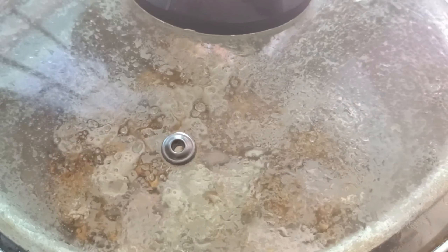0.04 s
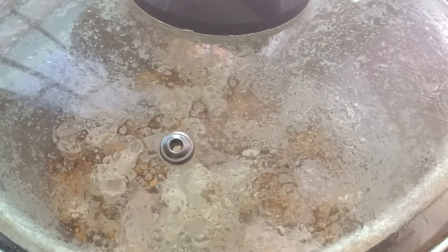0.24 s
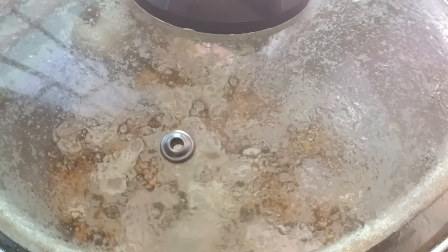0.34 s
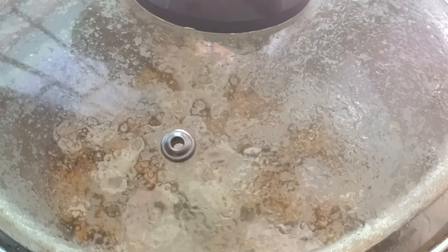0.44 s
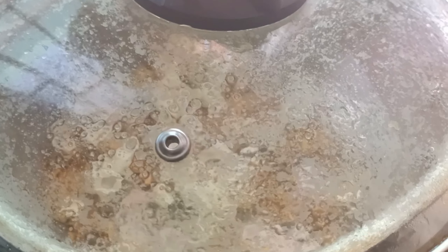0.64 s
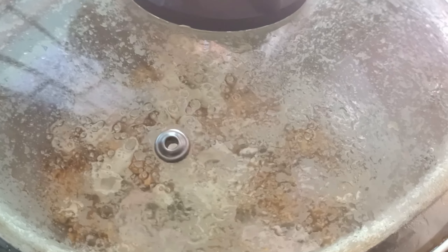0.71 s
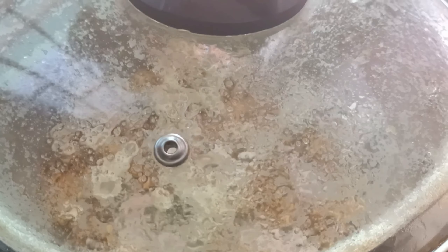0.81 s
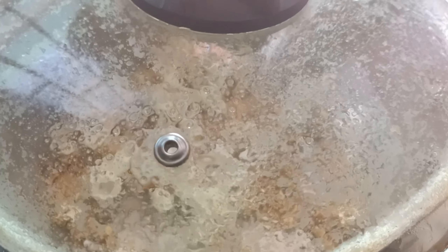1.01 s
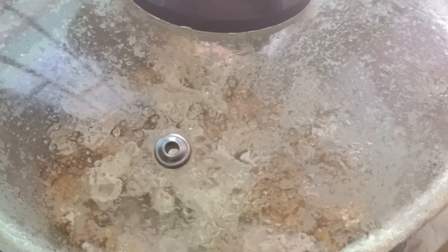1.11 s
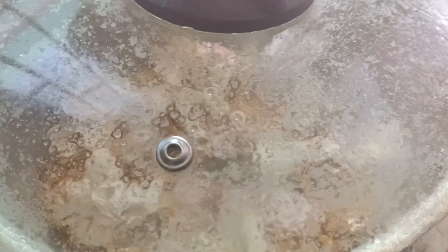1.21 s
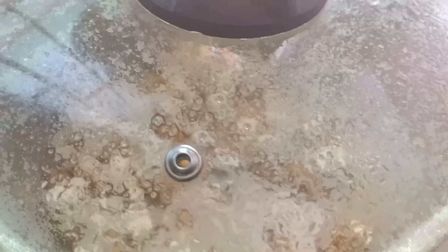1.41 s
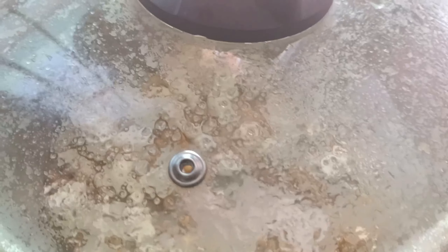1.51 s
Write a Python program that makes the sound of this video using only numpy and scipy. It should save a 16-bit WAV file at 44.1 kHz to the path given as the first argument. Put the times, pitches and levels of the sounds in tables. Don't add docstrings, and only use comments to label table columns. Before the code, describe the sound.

Close popcorn popping under a glass lid, with hollow thumps, steamy puffs and a faint oil sizzle

```python
import sys
import numpy as np
from scipy import signal
from scipy.fft import rfft, irfft
from scipy.io import wavfile
from scipy.ndimage import uniform_filter1d, map_coordinates

SR = 44100
rng = np.random.default_rng(int(sys.argv[2]) if len(sys.argv) > 2 else 0)


def boost_factor(decibels):
    exponent = np.asarray(decibels, float) / 20
    return 10 ** exponent


def pcm_store(signal):
    levels = np.round(np.clip(np.atleast_2d(signal), -1, 1) * 32767)
    wavfile.write(sys.argv[1], SR, levels.astype(np.int16).T)


N = 68355


def unit(x):
    return x / np.sqrt(np.mean(x ** 2) + 1e-20)


def along(points, hz):
    point_hz, value = np.transpose(points)
    return np.interp(np.log(hz + 1), np.log(point_hz + 1), value)


def add(track, start_s, sound):
    i = round(start_s * SR)
    part = sound[:, max(-i, 0):N - i]
    track[:, max(i, 0):max(i, 0) + part.shape[1]] += part


def wobble(rate_hz):
    knots = rng.standard_normal(int(N * rate_hz / SR) + 4)
    return map_coordinates(knots, [np.arange(N) * rate_hz / SR])


# pitch_hz, correlation (0 to 1)
ALIKE = [(100, 0.98), (250, 0.96), (600, .5), (1650, 0.06), (5000, 0)]


def rush(pair, colour_db):
    size = pair.shape[1]
    hz = np.fft.rfftfreq(size, 1 / SR)
    turn = np.arccos(np.clip(along(ALIKE, hz), -1, 1)) / 2
    spectra = rfft(pair) * boost_factor(colour_db(hz)) * [np.cos(turn), np.sin(turn)]
    mid, side = irfft(spectra, size)
    return unit(np.array([mid + side, mid - side]))


MODE_SCATTER_DB = 1
FLUTTER_S, FLUTTER_RAD = .006, .4


def ring(hz, modes, weight_db, rise_s):
    columns = np.vstack([hz, np.transpose(modes)])
    hz, db, t60_s, pan_db, lead_rad = (c[:, None] for c in columns)
    t = np.arange(SR // 4) / SR
    side = np.array([.5, -.5])[:, None, None]
    level_db = db + weight_db(hz) + MODE_SCATTER_DB * rng.standard_normal(hz.shape) - 60 * t / t60_s
    knots = rng.standard_normal((len(hz), int(t[-1] / FLUTTER_S) + 2))
    drift = np.array([np.interp(t / FLUTTER_S, np.arange(len(k)), k - k[0]) for k in knots])
    flutter = FLUTTER_RAD * drift * np.minimum(hz / 2500, 1)
    waves = np.sin(2 * np.pi * hz * t + flutter + side * lead_rad)
    return (boost_factor(level_db) * boost_factor(side * pan_db) * waves).sum(1) * (1 - np.exp(-t / rise_s)) ** 2


CONTACT_S, KNOCK_T60_S = 0.00038, 0.05


def struck(blows, modes_hz, modes):
    out = np.zeros((2, N))
    t = np.arange(SR // 10) / SR
    for start_s, level_db, centre_hz, spread_oct, *knock_db in blows:
        near_db = lambda hz: -6 * (np.log2((hz + 1) / centre_hz) / spread_oct) ** 2
        add(out, start_s, boost_factor(level_db) * ring(modes_hz, modes, near_db, CONTACT_S))
        if knock_db:
            knock = rush(rng.standard_normal((2, len(t))), near_db) * (1 - np.exp(-t / CONTACT_S))
            add(out, start_s, boost_factor(knock_db[0] - 60 * t / KNOCK_T60_S) * knock)
    return out


# pitch_hz, level_db
STEAM = [(300, -29.5), (520, -15.5), (950, -12), (1600, -13.5), (2000, -5.5), (4800, -7.5), (11200, -4.5),
         (15500, -15.5)]
WALL_PASS_DB, WALL_WIDTH = 6, 0.019


def through_walls(hz):
    near = sum(1 / (1 + ((hz - c) / (WALL_WIDTH * c)) ** 2) for c in [*POT_HZ, *LID_HZ])
    return along(STEAM, hz) + WALL_PASS_DB * np.minimum(near, 1)


# start_s, level_db, t60_s, brightness_db_per_octave
PUFFS = [(-.02, -32.5, 0.32, 1.5), (0.2421, -24, 0.4, -1.5), (.2853, -30, 0.55, -5),
         (0.3015, -32, 0.13, -5), (0.394, -36, .1, -5.5), (0.4194, -29, 0.45, -0.5),
         (0.474, -18.5, 0.31, 2.5), (.496, -22, 0.28, 0), (0.5927, -27.5, 0.29, -0.5),
         (.686, -36.5, 0.39, -5.5), (.869, -44, 0.57, 1), (0.8914, -25.5, 0.26, 4),
         (0.923, -36.5, 0.18, -3), (1.2301, -26.5, 0.19, -1), (1.537, -42.5, 0.26, -1.5)]
PUFF_RISE_S, CRACK_DB, CRACK_T60_S = 0.0014, 0.5, 0.042
TREBLE_FASTER = 0.26


def puffs():
    out = np.zeros((2, N))
    t = np.arange(SR // 3) / SR
    for start_s, level_db, t60_s, tilt_db in PUFFS:
        colour_db = lambda hz: through_walls(hz) + tilt_db * np.log2((hz + 1) / 4000)
        hiss = rush(rng.standard_normal((2, len(t))), colour_db)
        dull = uniform_filter1d(hiss, size=5)
        treble = (hiss - dull) * boost_factor(-60 * t / (t60_s * (1 - TREBLE_FASTER)))
        body = dull * boost_factor(-60 * t / t60_s) + treble
        crack = hiss * boost_factor(CRACK_DB - 60 * t / CRACK_T60_S)
        add(out, start_s, boost_factor(level_db) * (body + crack) * (1 - np.exp(-t / PUFF_RISE_S)))
    return out


# start_s, level_db, favoured_hz, spread_octaves
POT_BLOWS = [
    (-.02, -44.5, 1420, 1.3),
    (.2428, -27, 2060, 0.87),
    (.4198, -35.5, 2840, 0.93),
    (.4745, -24, 2550, 1.08),
    (.495, -31, 1780, 0.9),
    (.69, -48.5, 1860, 0.55),
    (.892, -39, 1730, 0.85),
    (1.2305, -35, 2000, 0.46),
    (1.232, -26, 3670, 0.13),
    (1.484, -47, 1600, 0.88),
]
POT_HZ = [810, 1050, 1313, 1937, 2085, 2386, 2967, 3591, 5055, 5378, 5430, 6300]
# level_db, t60_s, left_right_db, left_lead_rad
POT = [(-18, 0.045, 0, 2), (-8, 0.2, 9, 2), (1.5, 0.19, 2.5, -1.05), (4, 0.11, 9, 1.45),
       (3.5, 0.13, 1.5, 4), (5.5, 0.066, 15.5, -2), (-7, 0.24, 11, 0.5), (6, 0.19, -4, 3.61),
       (-21, 0.12, -8, -6), (2, 0.08, 1, -6), (4, 0.084, 24, -1), (-7, 0.084, -13, -23)]


def pot_blows():
    return struck(POT_BLOWS, POT_HZ, POT)


# start_s, level_db, high_mode_lean_db_per_octave
THUMPS = [(-.01, -41.5, 2.5), (.025, -45.5, 3), (.243, -30, -7.5), (0.296, -39, -9.5), (.42, -36.5, -2),
          (.476, -32, 5), (0.4937, -26.5, 2.5), (0.561, -46.5, 10), (.69, -58, 11), (0.893, -33.5, -0.5),
          (1.2292, -26, 3), (1.285, -42.5, 0), (1.325, -44.5, -3), (1.483, -56, 3.5), (1.528, -53.5, -0.5)]
AIR_HZ = [122, 165, 240, 282, 320, 460, 560]
# level_db, t60_s, left_right_db, left_lead_rad
AIR = [(0.5, 0.19, -0.5, -0.13), (4, 0.12, 0.5, -0.21), (-0.5, 0.17, -5, 0.3), (3.5, 0.098, 2, -0.093),
       (-4.5, 0.2, 2.5, 0.32), (-11.5, 0.12, -10.5, 0.03), (-11, 0.045, -10, -0.24)]
PUSH_DB, PUSH_T60_S, THUMP_RISE_S = 6, .032, 0.0017


def thumps():
    out = np.zeros((2, N))
    for start_s, level_db, lean_db in THUMPS:
        push = ring([270], [(PUSH_DB, PUSH_T60_S, 0, 0)], lambda hz: lean_db, THUMP_RISE_S)
        boom = ring(AIR_HZ, AIR, lambda hz: lean_db * np.log2(hz / 190), THUMP_RISE_S)
        add(out, start_s, boost_factor(level_db) * (push + boom))
    return out


# start_s, ring_db, favoured_hz,
# spread_octaves, knock_db
LID_TICKS = [(-.008, -36.5, 2900, 0.42, -58), (.244, -55, 3480, 1.46, -20.5),
             (.273, -25.5, 2860, 0.38, -25), (.2853, -32, 4430, 0.24, -20), (.3022, -23, 2720, 0.48, -21),
             (.3561, -36, 2900, 0.31, -23.5), (.367, -58, 2800, 0.078, -37),
             (.4205, -31, 5800, 1.03, -16.5), (.475, -43, 5650, 0.88, -14), (.553, -41, 4000, 0.65, -31),
             (.5926, -24, 4970, 0.71, -22), (.8924, -39, 5900, 0.18, -28), (.927, -56, 4270, 0.42, -38),
             (1.232, -59, 3260, .8, -40), (1.3104, -41, 3200, 0.15, -39), (1.4242, -45, 2970, 0.48, -39),
             (1.47, -42, 5250, 0.29, -44), (.2435, -60, 539, 0.18, -30.5)]
LID_HZ = [2544, 2750, 3198, 3850, 4313, 4457, 5140, 5440, 5794, 5916, 6788, 8678]
# level_db, t60_s, left_right_db, left_lead_rad
LID = [(0, .07, 12, -.1), (-2, .12, 5, 1), (-4, .1, -2, -1.6), (-10, .06, 0, 1), (-4, .05, -8, -1.7),
       (-1, .12, 10, 1.8), (-3, .16, 6, -2.2), (-8, .1, 0, .3), (-5, .1, 1, -2.9), (-10, .15, 0, 1),
       (-9, .12, -5, -2.2), (-14, .07, -4, 1.6)]


def lid_ticks():
    return struck(LID_TICKS, LID_HZ, LID)


# time_s, level_db
SIZZLE = [(0, -51), (.2, -47.5), (.55, -41), (.8, -42.5), (.98, -46), (1.131, -44.5), (1.141, -39),
          (1.2, -41.5), (1.23, -40.5), (1.39, -45.5), (1.405, -41), (1.44, -39), (1.464, -44),
          (1.55, -45.5)]
# pitch_hz, level_db
FIZZ = [(1200, -26), (1700, -29), (2060, -4), (3850, -7), (5500, -5.5), (8800, -4.5), (15500, -9)]


def sizzle():
    time_s, level_db = np.transpose(SIZZLE)
    spikes = boost_factor(np.minimum(3 * rng.exponential(size=(2, N)), 14))
    fizz = rush(spikes * rng.standard_normal((2, N)), lambda hz: along(FIZZ, hz))
    swell_db = np.interp(np.arange(N) / SR, time_s, level_db)
    return boost_factor(swell_db + 1.16 * wobble(59.96)) * fizz


# pitch_hz, level_db
BURNER = [(25, 1), (48, -15), (76, -4), (165, -1.5), (215, -17), (474, -18), (1000, -22), (1900, -25.5),
          (2600, -65)]
BURNER_DB = -50


def burner():
    rumble = rush(rng.standard_normal((2, N)), lambda hz: along(BURNER, hz))
    return boost_factor(BURNER_DB + 0.9 * wobble(12.7)) * rumble


def fading(t60_of_hz, size):
    hz, t, z = signal.stft(rng.standard_normal((2, size)), SR, nperseg=256)
    z = z * boost_factor(-60 * t / t60_of_hz(hz + 1)[:, None])
    return signal.istft(z, SR, nperseg=256)[1][:, :size]


# pitch_hz, t60_s
KITCHEN = [(150, 0.48), (1000, 0.38), (5000, 0.23), (14000, .25)]
KITCHEN_DB, KITCHEN_DELAY_S = -12, .008


def kitchen(x):
    tail = fading(lambda hz: along(KITCHEN, hz), size=SR // 2)
    late = np.pad(x.mean(0), (round(KITCHEN_DELAY_S * SR), 0))[None]
    wet = signal.fftconvolve(late, tail / np.linalg.norm(tail[0]), axes=1)[:, :N]
    low = uniform_filter1d(wet, size=60)
    return boost_factor(KITCHEN_DB) * (wet - low + low[0])


def scene():
    pops = puffs() + pot_blows() + thumps() + lid_ticks()
    return pops + kitchen(pops) + sizzle() + burner()


def top_cut(x):
    return signal.sosfilt(signal.butter(12, 16330, fs=SR, output="sos"), x)


def record(dry):
    low_cut = signal.butter(2, 53.3, "high", fs=SR, output="sos")
    high_cut = signal.cheby2(10, 50, 15900, fs=SR, output="sos")
    mix = signal.sosfilt(np.vstack([low_cut, high_cut]), dry)
    return top_cut(mix)


dry = scene()
out = record(dry)
pcm_store(out)
```